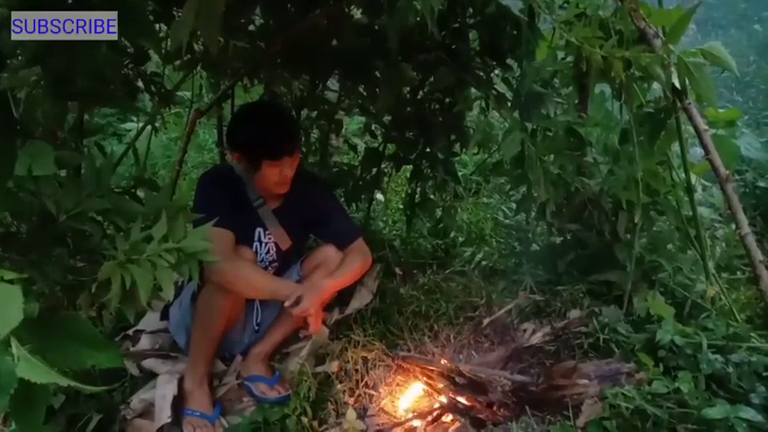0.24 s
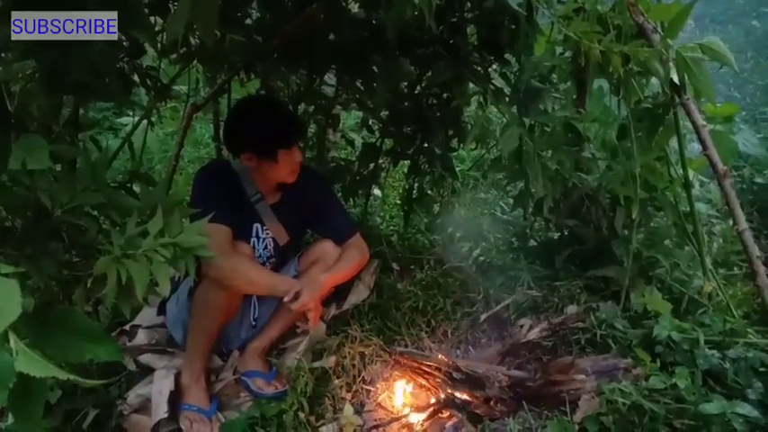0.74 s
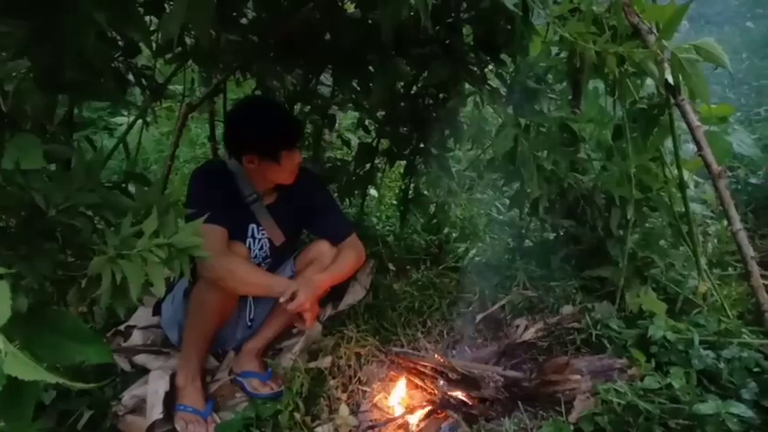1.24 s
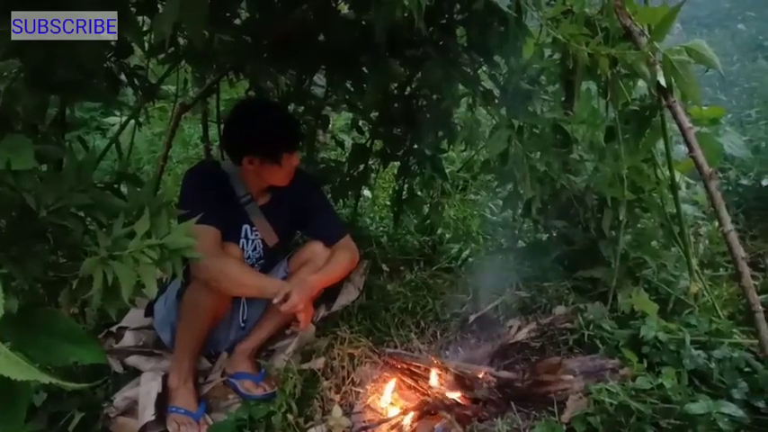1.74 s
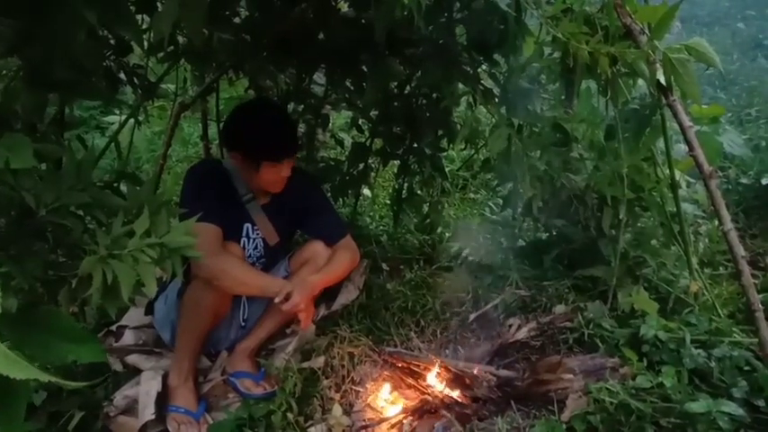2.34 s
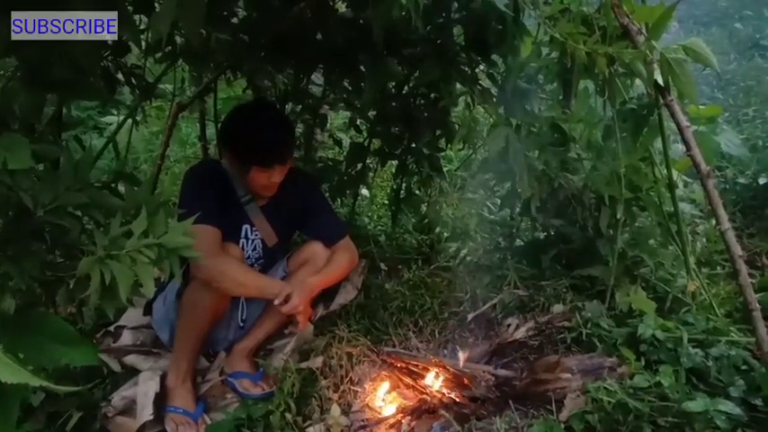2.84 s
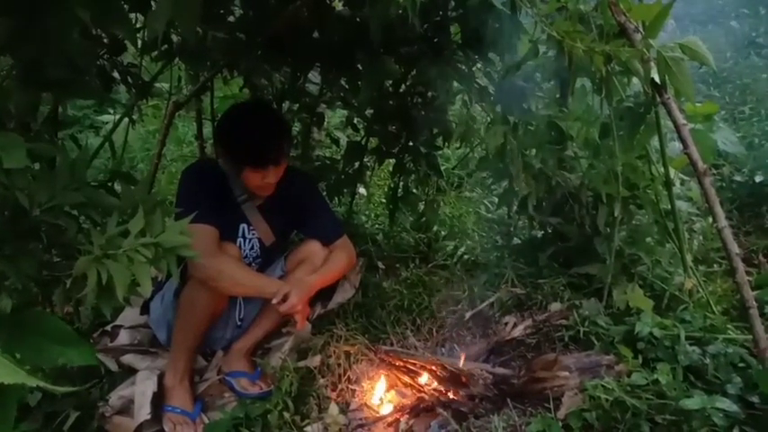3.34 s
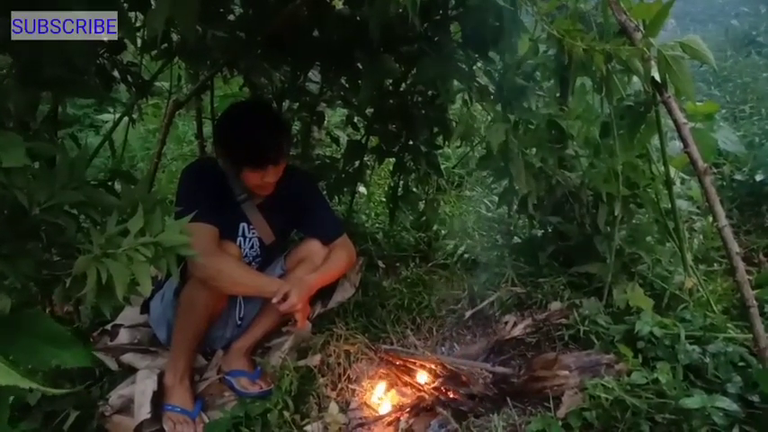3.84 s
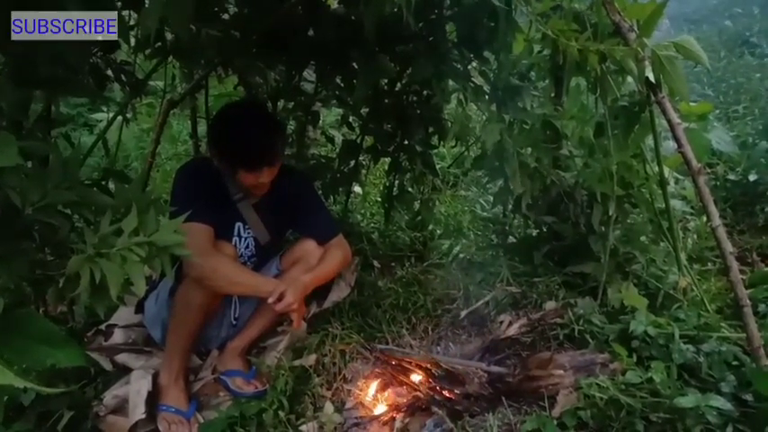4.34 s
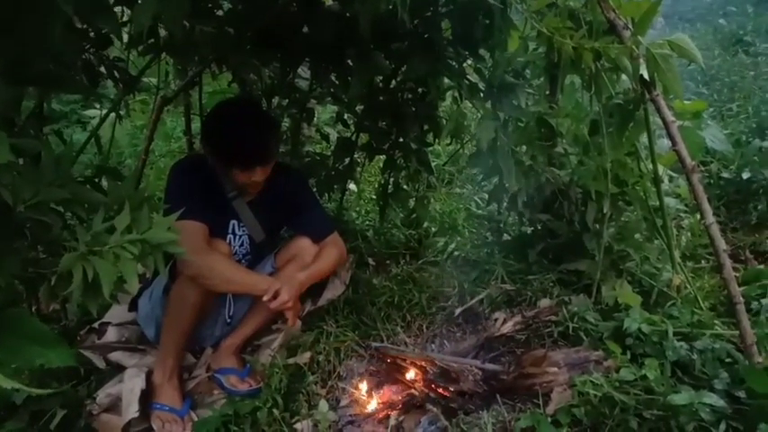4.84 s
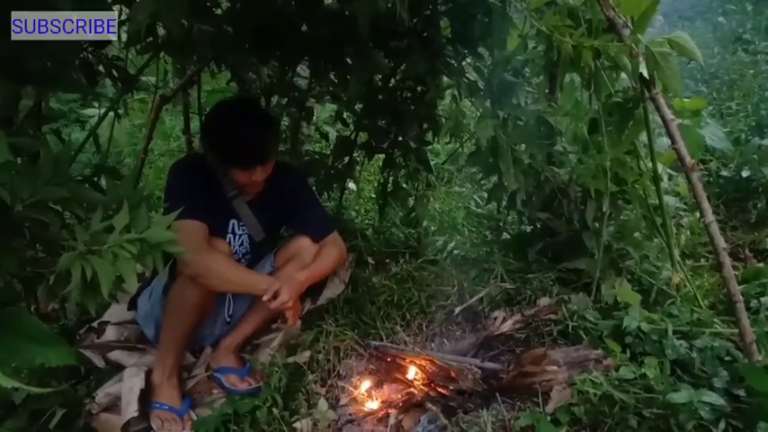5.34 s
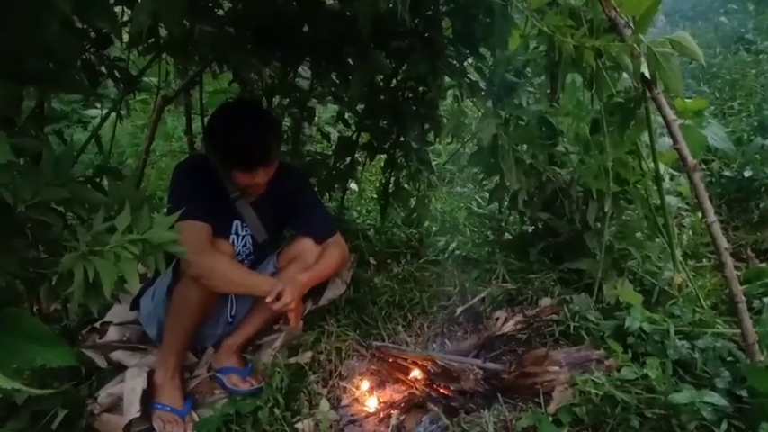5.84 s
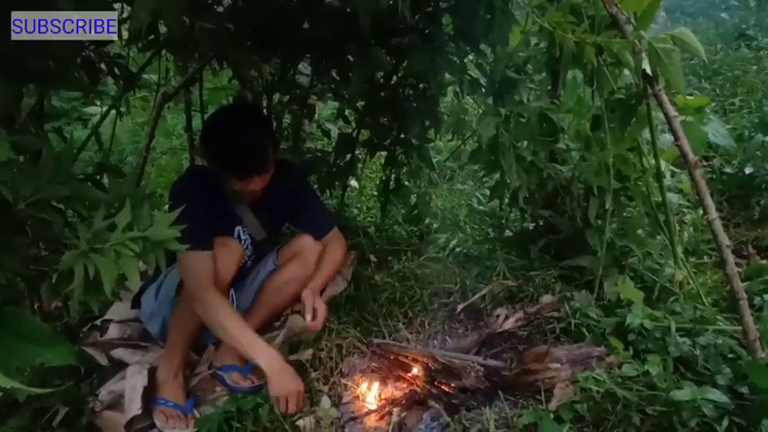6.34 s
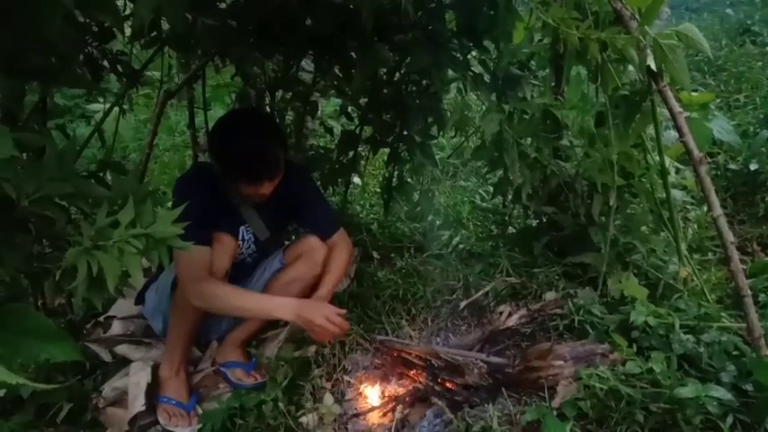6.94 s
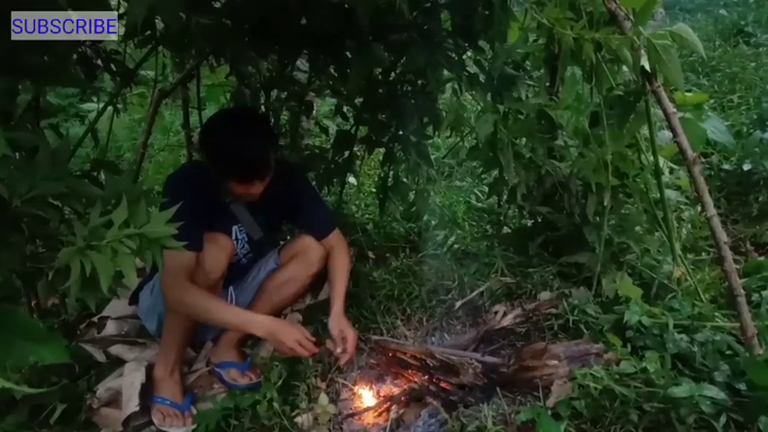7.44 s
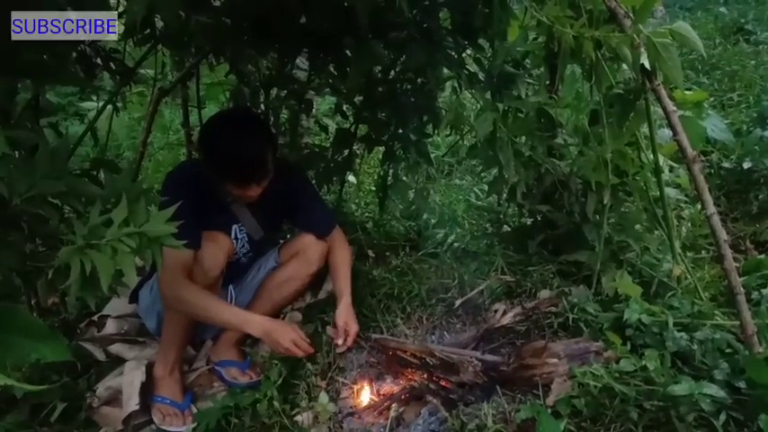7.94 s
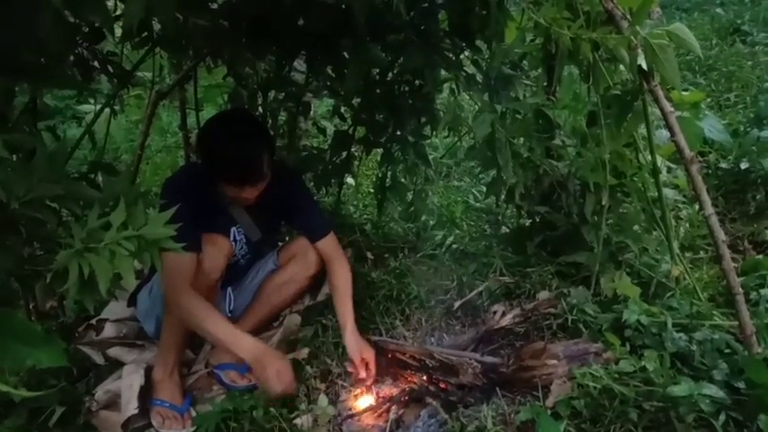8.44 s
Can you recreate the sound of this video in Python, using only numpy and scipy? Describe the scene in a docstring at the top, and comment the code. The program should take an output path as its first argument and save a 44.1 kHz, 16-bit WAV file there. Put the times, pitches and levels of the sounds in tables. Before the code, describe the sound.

In a leafy forest clearing, a close, dry-sounding little fire pops and ticks over steady airy hush and soft bass flutter. First a soft, uneven cricket trill in the distance, then stronger wood snaps around two, five and six seconds. Raspy high insect chirps rise in the middle and stop. Later a hand stirs dry leaves with small rustles and soft bumps. Nearly mono, slightly coloured small microphone, short leafy tail.

```python
"""A far cricket's halting trill comes first, over the low flutter of a small twig fire in a forest clearing.
Steam then splits the wood with sharp pops (filtered noise, a pressure step and two ringing modes), over
fine crackle and bright ticks (clicks and noise ringing at a splinter's pitch); a hand stirs dry litter (grainy noise).
A nearer insect chirps in raspy sliding tones over a faint shimmer of soft pips; a two-tone drone swells and sinks.
Shaped noise makes flames and forest hush; leaves give fire, insects and pips a short tail of scattered noise."""
import sys
import numpy as np
from scipy import signal
from scipy.fft import rfft, irfft
from scipy.io import wavfile

SR = 44100
rng = np.random.default_rng(int(sys.argv[2]) if len(sys.argv) > 2 else 0)


def digitize_waveform(pressure):
    """Quantize a signal to 16-bit integers and store it at the path in sys.argv[1].

    Rows of a 2-D input are taken as channels; values are limited to [-1, 1].
    """
    field = np.atleast_2d(pressure).T
    bounded = np.clip(field, -1, 1)
    quanta = np.round(bounded * 32767).astype(np.int16)
    wavfile.write(sys.argv[1], SR, quanta)


N = 383669
TIME = np.arange(N) / SR
TOP_HZ = 15700  # upper limit of the microphone

# All levels are dry, ahead of the microphone's colour; those of the pops are also ahead of the pile's.
# The clearest pops, each a crack and two modes of its twig, mode levels against the crack:
# (time [s], level over 10 ms [dB], lowest [Hz], highest [Hz], decay [s],
#  low mode [Hz], its level [dB], high mode [Hz], its level [dB])
WOOD_POPS = [(0.4158, -39.5, 605, 1610, 0.011, 960, -6, 1255, -3),
             (0.4866, -49, 1000, 3000, 0.0054, 1250, -1, 1900, -4),
             (0.508, -34, 2200, 6440, 0.0077, 2030, 1.5, 5500, -5),
             (0.8882, -49.5, 1600, 3480, 0.0034, 1910, 2, 2180, 8),
             (1.5658, -40.5, 497, 2160, 0.0092, 1238, -6, 2780, -8),
             (2.1106, -28.5, 1190, 4520, 0.0021, 235, -4, 527, -5.5),
             (2.1136, -28, 1490, 6750, 0.0031, 544, 1, 5450, -13),
             (2.1204, -38, 1200, 7000, 0.0023, 1330, -2, 3840, 5),
             (2.262, -49.5, 1400, 2400, 0.0032, 1750, 13, 1910, 13),
             (2.4924, -41.5, 420, 3420, 0.007, 1290, -4, 4670, -7),
             (2.9229, -35, 196, 2820, 0.0093, 475, -9, 1273, -2),
             (3.466, -44.5, 1300, 3520, 0.0058, 1910, -28, 5070, -18),
             (3.894, -44, 1680, 3400, 0.0042, 1940, 4, 4580, -20),
             (3.968, -47, 250, 4200, 0.005, 970, -9, 4800, -9),
             (4.239, -40.5, 1170, 2450, 0.011, 1220, -5.5, 1710, -8),
             (4.6, -46.5, 1040, 1800, 0.007, 1330, -5, 1870, -8),
             (4.6742, -41.5, 1270, 3160, 0.021, 1830, -8, 3400, -0.5),
             (5.0995, -24.5, 171, 1850, 0.003, 1340, -4, 1750, -14),
             (5.121, -39.5, 100, 3200, 0.0046, 800, -9, 1900, -12),
             (5.2013, -44.5, 890, 2250, 0.005, 1770, -3, 4650, -8),
             (5.2255, -42.5, 2020, 3220, 0.041, 1890, -7, 2880, -12),
             (5.266, -46.5, 1400, 2800, 0.0065, 1940, -4, 2920, -12),
             (5.602, -45.5, 900, 2600, 0.027, 1220, -3, 2880, -11),
             (5.6636, -35.5, 490, 2110, 0.01, 940, -11, 1250, -5),
             (6.0179, -24.5, 540, 3560, 0.0019, 1150, -7.5, 2700, -5),
             (6.1186, -43, 1300, 2380, 0.022, 1380, -13, 1860, -22),
             (6.7464, -40.5, 714, 2420, 0.021, 1220, -10, 3230, -3.5),
             (7.031, -34.5, 905, 4250, 0.0034, 1630, 0, 4500, -4.5),
             (7.657, -40, 1110, 2200, 0.016, 1300, -8, 2370, -7),
             (7.741, -46.5, 1870, 3000, 0.0023, 1890, -16, 2940, 0),
             (8.059, -43.5, 1510, 2200, 0.0077, 1690, 12, 1870, 9),
             (8.1975, -48, 900, 1800, 0.01, 1300, -13, 1740, 2),
             (8.2641, -44.5, 1630, 2400, 0.019, 1940, 1.5, 2860, -21),
             (8.319, -48.5, 1700, 2400, 0.0076, 1900, 6, 2190, 9)]
# Small pops, one at random in each slot of time: typical level and its spread, range of pitch, typical decay
SMALL_PER_S, SMALL_DB, SMALL_SPREAD_DB, SMALL_HZ, SMALL_DECAY_S = 4.1, -57.5, 4, (1280, 3930), 0.016
# A mode's decay at the reference pitch (shorter when higher), and its rise
RING_S, RING_AT_HZ, RING_RISE_S = 0.0034, 1300, 0.0008
# Colour that the pile of twigs gives every pop: (centre [Hz], width [Hz], gain [dB])
PILE_COLOUR = [(190, 25, 7), (366, 30, -2.5), (498, 40, 7), (632, 100, -11.5), (880, 74, 3),
               (1320, 190, -2), (10600, 600, -15), (12800, 8400, -10)]
# The clearest ticks of bursting splinters: (time [s], level over 10 ms [dB], pitch [Hz], decay [s])
SPLINTER_TICKS = [(0.2, -60.5, 5600, 0.0048), (0.2218, -53.5, 4800, 0.01), (0.508, -50, 13600, 0.0033),
                  (0.9434, -50, 6740, 0.012), (1.323, -54, 5700, 0.013), (2.116, -47, 13800, 0.003),
                  (2.4553, -58, 8560, 0.007), (2.5238, -54.5, 5400, 0.017), (3.2456, -67, 7250, 0.0044),
                  (3.334, -61, 8440, 0.0036), (3.554, -70, 6900, 0.004), (3.732, -60, 6070, 0.013),
                  (3.8044, -65, 7700, 0.005), (3.817, -51.5, 6000, 0.0071), (3.945, -59, 5960, 0.003),
                  (4.239, -52, 5150, 0.0093), (4.4574, -62.5, 9450, 0.0066), (4.81, -54, 14100, 0.0035),
                  (5.1, -42, 7900, 0.00093), (5.2255, -58.5, 8000, 0.0041), (5.368, -70, 7900, 0.003),
                  (5.461, -70, 7850, 0.003), (5.6222, -69, 7900, 0.0035), (6.336, -65, 9000, 0.007),
                  (6.439, -62, 7000, 0.006), (6.4528, -49.5, 6060, 0.012), (6.501, -64, 6350, 0.002),
                  (6.6736, -67, 6900, 0.003), (6.866, -77, 14000, 0.003), (7.0316, -43.5, 7400, 0.0011),
                  (7.149, -63, 6700, 0.0081), (7.9614, -63, 8500, 0.0084), (8.2534, -59.5, 7000, 0.011)]
# A splinter's spit: after-clicks a second, size of the first click, level of the fizz, all before they fade
SPIT_PER_S, SPIT_FIRST, SPIT_FIZZ_DB = 2000, 1.0, -15
# Resting level of the sizzle, and decay of the noise that drives each of its ticks
SIZZLE_DB, SIZZLE_DECAY_S = -72, 0.007
# Flare-ups of the sizzle: (time of peak [s], half length [s], rise [dB])
SIZZLE_FLARES = [(3.7, 1, 6.6), (6.45, 1, 8.9), (8.4, 0.87, 7.7)]
# Rustles and soft bumps in dry litter:
# (time [s], level over 10 ms [dB], lowest [Hz], highest [Hz], decay [s])
LITTER_RUSTLES = [(5.883, -44, 90, 326, 0.019), (6.44, -42, 1590, 2500, 0.026),
                  (6.558, -44, 3400, 4170, 0.039), (6.659, -44.5, 119, 167, 0.083),
                  (7.563, -41.5, 110, 252, 0.025), (7.637, -48, 120, 190, 0.025),
                  (8.074, -49, 1700, 1930, 0.019), (8.306, -54, 1900, 2200, 0.022),
                  (8.198, -47.5, 130, 300, 0.03), (8.56, -49, 130, 262, 0.045)]
# Chirps of the near insect, ahead of the stroke levels: (time [s], level [dB])
INSECT_CHIRPS = [(2.81, -53.5), (3.061, -55), (3.302, -56), (3.584, -57.5), (3.866, -58), (3.98, -57),
                 (4.184, -43), (4.43, -43), (4.641, -42), (4.886, -43), (5.133, -40.5), (5.379, -40.5)]
# Wing strokes within a chirp, level against the chirp: (delay [s], level [dB])
WING_STROKES = [(0.0, -8.5), (0.036, -3), (0.07, -4)]
# The harder it chirps, the higher the pitch: pitch at the reference level
CHIRP_HZ, CHIRP_AT_DB, CHIRP_HZ_PER_DB = 4740, -43, 14
# Each stroke slides down: share of the pitch to either side, time of the slide at the reference level
STROKE_FALL, STROKE_SWEEP_S = 0.09, 0.014
STROKE_RASP = 0.42  # roughness, 0-1
STROKE_SLOWING = 0.4  # dB of added length per dB of lost level
# Beeps of the far cricket's halting trill: (time [s], level [dB])
CRICKET_BEEPS = [(0.038, -55), (0.103, -54), (0.165, -62), (0.275, -62), (0.335, -60), (0.377, -54),
                 (0.437, -50), (0.496, -49), (0.555, -52), (0.622, -54), (0.69, -54), (0.755, -57.5),
                 (0.81, -55), (0.87, -56), (0.932, -54.5), (0.99, -65), (1.048, -54), (1.095, -54),
                 (1.175, -55), (1.355, -52), (1.402, -53), (1.485, -74)]
BEEP_JITTER, BEEP_RASP = 0.005, 0.35  # scatter of pitch as a share, roughness 0-1
# Faint shimmer of short soft pips: pips a second, range of pitch, rms level, range of the pips' levels
PIPS_PER_S, PIPS_HZ, PIPS_DB, PIP_RANGE_DB = 320, (4300, 6000), -70.5, 8
DRONE_DB, DRONE_WAVER = -72, 0.011  # resting level, wander of pitch as a share
# Swells of the far drone: (time of peak [s], half length [s], rise [dB])
FAR_DRONE_SWELLS = [(0.85, 0.19, 6.4), (3.8, 0.2, 7), (4.68, 0.24, 7.3), (5.47, 0.58, 16.4),
                    (7.35, 0.67, 7)]
# Spectrum of forest air and flame flutter, ahead of the hush bands: (frequency [Hz], density [dB per Hz])
AIR_SPECTRUM = [(25, -101), (45, -92.5), (80, -74.5), (150, -77), (260, -89), (400, -92.5), (1000, -92.5),
                (1450, -93.5), (1950, -93.5), (2350, -99.5), (2900, -93.5), (4200, -100.5), (5400, -103.5),
                (7000, -108.5), (8000, -114), (10000, -118.5), (15000, -125)]
SHIMMER_DB, SHIMMER_PER_S = 1.6, 60  # depth and pace of the hush's fine shimmer
# Bands in which the hush is stronger: (centre [Hz], width [Hz], gain [dB])
STRONG_HUSH = [(1248, 40, 8), (1859, 350, 10)]
# The low flutter swells slightly near the end: (time of peak [s], half length [s], rise [dB])
LOW_FLUTTER_SWELL = [(8.3, 0.98, 2)]
# Peaks and dips of the microphone port and case: (centre [Hz], width [Hz], gain [dB])
MIC_COLOUR = [(1260, 70, 8), (1850, 300, 5), (3800, 700, -4), (4650, 600, 5), (5550, 1000, 10),
              (6560, 480, -12), (7350, 600, 3), (8600, 2400, 3), (10300, 1400, 5), (13000, 3000, -7),
              (15000, 800, 13)]


def pops(small_ring_db=-6):
    """The big pops of the wood, and small ones at random between them, all ringing in the pile."""
    out = np.zeros(N)
    for s, *shape in WOOD_POPS:
        add(out, s, pop(*shape))
    lowest_hz, highest_hz = SMALL_HZ
    for slot in np.arange(0, TIME[-1] * SMALL_PER_S - 1):
        when, place = rng.random(2)
        size, length = rng.standard_normal(2)
        hz = lowest_hz * (highest_hz / lowest_hz) ** place
        db = SMALL_DB + SMALL_SPREAD_DB * size
        decay = SMALL_DECAY_S * np.exp(length / 2)
        small = pop(db, hz, hz, decay, hz, small_ring_db, 2 * hz, 2 * small_ring_db)
        add(out, (slot + when) / SMALL_PER_S, small)
    return resonate(out, PILE_COLOUR)


def pop(db, lo_hz, hi_hz, decay, low_hz, low_db, high_hz, high_db,
        snap=1.04, snap_s=0.0023, linger=1.82, rise=0.047, split_hz=1900, body_hz=190):
    """A pressure step and a rattle of tearing fibres, whose lows die more slowly; the twig rings in two modes."""
    t = TIME[:SR // 12]
    low = band(rng.standard_normal(len(t)), body_hz, split_hz) * np.exp(-t / (decay * linger))
    high = band(rng.standard_normal(len(t)), split_hz, TOP_HZ) * np.exp(-t / decay)
    crack = (low + high) * (1 - np.exp(-t / (rise * decay)))
    crack /= np.linalg.norm(crack)
    crack[0] += snap / (1 + (decay / snap_s) ** 2 / 2)  # the shorter the pop, the stronger its step
    modes = ring(t, low_hz, low_db) + ring(t, high_hz, high_db)
    return energy(burst(crack, 0, lo_hz, hi_hz) + modes, db)


def ring(t, hz, db):
    """One mode of a twig: a woody note of a few milliseconds, shorter when higher."""
    decay = RING_S * np.sqrt(RING_AT_HZ / hz)
    fade = np.exp(-t / decay) * (1 - np.exp(-t / RING_RISE_S))
    return energy(fade * np.cos(2 * np.pi * hz * t), db)


def puff(s=2.1106, db=-25.0, lo_hz=90, hi_hz=260):
    """A steam pocket also shoves the air: one low thump, a band-limited impulse."""
    out = np.zeros(N)
    add(out, s, burst(signal.unit_impulse(SR // 20), db, lo_hz, hi_hz))
    return out


def ticks(lift_db=5, width=0.35):
    """A splinter bursts in a short, bright spit of tiny clicks around its own pitch."""
    out, t = np.zeros(N), TIME[:SR // 16]
    for s, db, hz, decay in SPLINTER_TICKS:
        clicks = band(spit(t, decay), hz / 2, 3 * hz / 2)
        bright = resonate(clicks, [(hz, width * hz, lift_db)])
        add(out, s, burst(bright, db, hz, hz))
    return out


def spit(t, decay):
    """A splinter gives way with one click, then a dying run of after-clicks over a faint fizz."""
    chance = rng.random(len(t))
    size, fizz = rng.standard_normal((2, len(t)))
    after_clicks = size * (chance < SPIT_PER_S / SR)
    clicks = (after_clicks + undb(SPIT_FIZZ_DB) * fizz) * np.exp(-t / decay)
    clicks[0] += SPIT_FIRST
    return clicks


def crackle(rate=170, lowest_hz=2500, highest_hz=9500, spread_db=3.0, sharpness=3.4, tilt=1.0):
    """Countless faint ticks, each ringing briefly at the pitch of its own splinter."""
    out, t = np.zeros(N), TIME[:SR // 40]
    for when, chance, place in rng.random((int(rate * TIME[-1]), 3)):
        hz = lowest_hz * (highest_hz / lowest_hz) ** place
        splinter = signal.iirpeak(hz, sharpness, fs=SR)
        tick = rng.standard_normal(len(t)) * np.exp(-t / SIZZLE_DECAY_S)
        for _ in range(2):
            tick = signal.lfilter(*splinter, tick)
        size = undb(spread_db * min(-np.log(1 - chance), 3))  # mostly small, a few larger
        add(out, when * TIME[-1], size * unit(tick) / hz ** tilt)  # small splinters are quieter
    return unit(out) * undb(SIZZLE_DB + swells(SIZZLE_FLARES))


def rustles(grain_db=4, leaf_db=8, leaf_width=0.24):
    """Dry leaves crumple in a swell of tiny uneven clicks, strongest in the middle of their band."""
    out, t = np.zeros(N), TIME[:SR // 5]
    for s, db, lo_hz, hi_hz, decay in LITTER_RUSTLES:
        grains = rng.standard_normal(len(t)) * undb(grain_db * rng.standard_normal(len(t)))
        swell = np.exp(-t / decay) * (1 - np.exp(-t / 0.0028))
        hz = np.sqrt(lo_hz * hi_hz)
        crumple = resonate(grains * swell, [(hz, leaf_width * hz, leaf_db)])
        add(out, s, burst(crumple, db, lo_hz, hi_hz))
    return out


def chirper(db_jitter=-0.4, pitch_jitter=0.00443):
    """Wing strokes sound as raspy tones that swell and slide down; weak chirps have slower, softer strokes."""
    out = np.zeros(N)
    t = TIME[:SR // 12] - 1 / 40  # zero near the top of the stroke
    for s, db in INSECT_CHIRPS:
        pace = t / undb(STROKE_SLOWING * (CHIRP_AT_DB - db))
        envelope = 2 / (np.exp(-pace / .0035) + np.exp(pace / .0065))  # quick rise, slower fall
        glide = 1 - STROKE_FALL * np.tanh(pace / STROKE_SWEEP_S)
        chirp_hz = CHIRP_HZ + CHIRP_HZ_PER_DB * (db - CHIRP_AT_DB)
        for delay, stroke_db in WING_STROKES:
            force, tuning = rng.standard_normal(2)
            hz = chirp_hz * (1 + pitch_jitter * tuning)
            teeth = 1 + STROKE_RASP * unit(band(rng.standard_normal(len(t)), 150, 300))
            tone = np.sin(2 * np.pi * np.cumsum(hz * glide) / SR)
            gain = undb(db + stroke_db + db_jitter * force)
            add(out, s + delay + t[0], gain * envelope * teeth * tone)
    return out


def cricket(hz=2730, drift_hz_per_s=22, sag=0.0071):
    """Each wing closure gives a soft, slightly rough beep that sags a little; the whole trill drifts down."""
    out, stroke = np.zeros(N), np.linspace(0, 1, SR // 16)
    for s, db in CRICKET_BEEPS:
        bend = 1 + BEEP_JITTER * rng.standard_normal() - sag * (stroke - .5)
        pitch = (hz - drift_hz_per_s * s) * bend
        beep = np.sin(np.pi * stroke) ** 2 * np.sin(2 * np.pi * np.cumsum(pitch) / SR)
        add(out, s - len(stroke) / SR / 2, undb(db) * beep)
    return out * (1 + BEEP_RASP * walk(130))


def shimmer_pips():
    """Short, soft sine pips at random times, each at its own pitch, blend into a faint shimmer."""
    out, t = np.zeros(N), TIME[:SR // 36]
    lo_hz, hi_hz = PIPS_HZ
    for when, place, size in rng.random((int(PIPS_PER_S * TIME[-1]), 3)):
        hz = lo_hz + place * (hi_hz - lo_hz)
        pip = np.hanning(len(t)) * np.sin(2 * np.pi * hz * t)
        add(out, when * TIME[-1], undb(-PIP_RANGE_DB * size) * pip)
    return undb(PIPS_DB) * unit(out)


def drone(hz=573.0, upper_hz=783, upper_db=-11):
    """Two faint sine tones from far away, wavering in pitch apart and in level together."""
    def wavering(centre_hz):
        return np.sin(2 * np.pi * np.cumsum(centre_hz * (1 + DRONE_WAVER * walk(40))) / SR)

    tones = wavering(hz) + undb(upper_db) * wavering(upper_hz)
    return undb(DRONE_DB + swells(FAR_DRONE_SWELLS) + 3.2 * walk(30)) * tones


def air(flutter_db=3.5, top_shimmer_db=0.5):
    """Flames flutter in the bass; the forest hush above shimmers band by band under a smooth top."""
    hz = np.arange(N // 2 + 1) * SR / N + 1
    points_hz, points_db = np.transpose(AIR_SPECTRUM)
    shape = undb(np.interp(np.log(hz), np.log(points_hz), points_db)) * np.sqrt(SR / 2)
    spectrum = rfft(rng.standard_normal(N)) * shape
    edges = [0, 300, 800, 1500, 2300, 3500, 4700, 5400, 7000, SR]
    flutter = flutter_db * walk(16) + swells(LOW_FLUTTER_SWELL)
    shimmer = [SHIMMER_DB * walk(SHIMMER_PER_S) for _ in edges[3:]]
    levels = [flutter, *shimmer, top_shimmer_db * walk(25)]
    out = np.zeros(N)
    for lo, hi, db in zip(edges, edges[1:], levels):
        out += undb(db) * irfft(spectrum * ((hz >= lo) & (hz < hi)), N)
    return resonate(out, STRONG_HUSH)


def foliage(x, wet_db, t60, build_s=0.005):
    """A sound together with its tail from the leaves."""
    return x + undb(wet_db) * scatter(x, t60, build_s)


def scatter(x, t60, build_s=0.0076):
    """Leaves and stems scatter a sound into a dense short tail; the bass passes through them."""
    t = TIME[:SR // 2]
    fade = undb(-60 * t / t60) * (1 - np.exp(-t / build_s))
    tail = band(rng.standard_normal(len(t)), 460, 7600) * fade
    return signal.fftconvolve(x, tail / np.linalg.norm(tail))[:N]


def undb(db):
    """Decibels to gain."""
    return 10 ** (np.asarray(db) / 20)


def unit(x):
    """Scale to rms 1."""
    return x / np.sqrt(np.mean(x ** 2))


def energy(x, db):
    """Give a short sound the energy of 10 ms at the level db."""
    return x * undb(db) * np.sqrt(SR / 100) / np.linalg.norm(x)


def band(x, lo_hz, hi_hz):
    """Second-order slopes below and above the band."""
    for hz, kind in ((lo_hz, "high"), (hi_hz, "low")):
        x = signal.lfilter(*signal.butter(2, min(hz, SR / 2 - 1000), kind, fs=SR), x)
    return x


def burst(x, db, lo_hz, hi_hz):
    """Confine a burst to its band and set its level."""
    return energy(band(x, lo_hz, hi_hz), db)


def resonate(x, peaks):
    """Lift or sink bands, one after another, given as (centre [Hz], width [Hz], gain [dB])."""
    for hz, width, db in peaks:
        x = x + (undb(db) - 1) * signal.lfilter(*signal.iirpeak(hz, hz / width, fs=SR), x)
    return x


def swells(rows):
    """Bell-shaped rises in dB from rows of (time of peak [s], half length [s], rise [dB])."""
    return sum(db * np.exp(-((TIME - s) / half) ** 2) for s, half, db in rows)


def walk(rate):
    """Smooth random wander through rate points a second, spread near 1."""
    knots = rng.standard_normal(int(TIME[-1] * rate) + 2)
    return np.interp(TIME * rate, np.arange(len(knots)), knots) * np.sqrt(3 / 2)


def add(out, s, x):
    """Mix x into out at time s."""
    i = int(np.clip(s * SR, 0, N - 1))
    out[i:i + len(x)] += x[:N - i]


def scene(side_db=-26, leaves_side_db=-31):
    """The fire is close and dry; the insects sit in the leaves; all is nearly centred."""
    fire = foliage(pops() + puff() + rustles() + ticks() + crackle(), wet_db=-23, t60=.25)
    near = foliage(chirper(), wet_db=-6, t60=0.23, build_s=0.004)
    insects = near + foliage(cricket(), wet_db=-8, t60=0.2)
    scattered = fire + insects + shimmer_pips()
    mid = scattered + drone() + air()
    side = undb(side_db) * air() + undb(leaves_side_db) * scatter(scattered, t60=0.02)
    return np.array([mid + side, mid - side])


def record(dry):
    """The microphone's port and case lift some bands and sink others; a steep filter cuts the top."""
    top_cut = signal.ellip(8, .2, 70, TOP_HZ, fs=SR, output="sos")
    return signal.sosfilt(top_cut, resonate(dry, MIC_COLOUR))


dry = scene()
out = record(dry)
digitize_waveform(out)
```